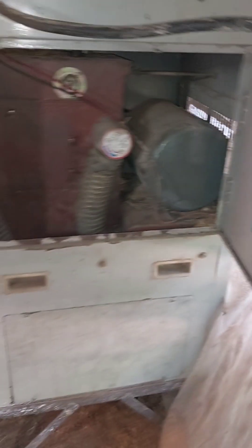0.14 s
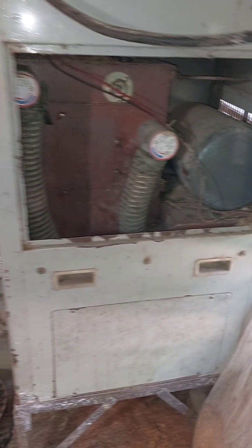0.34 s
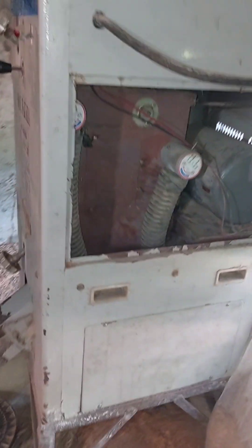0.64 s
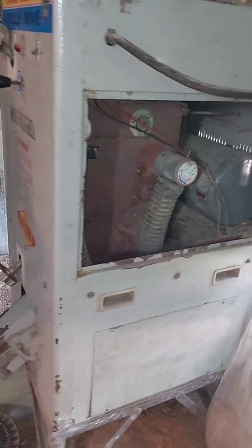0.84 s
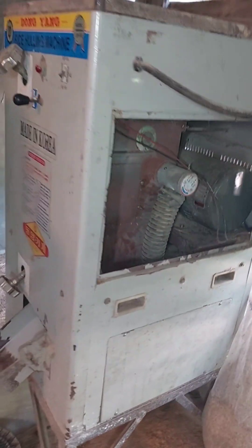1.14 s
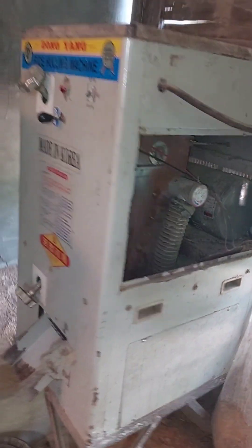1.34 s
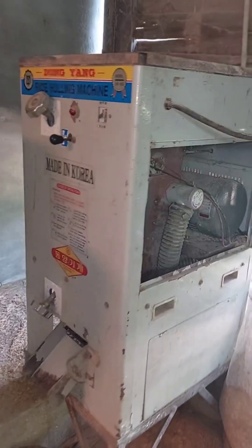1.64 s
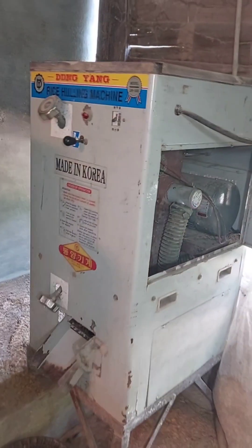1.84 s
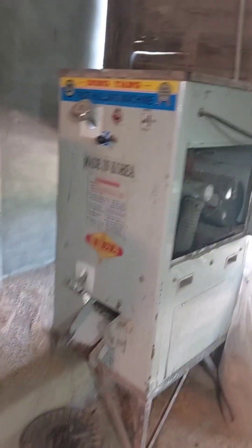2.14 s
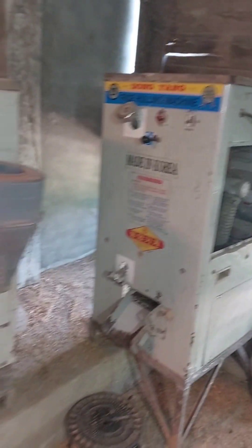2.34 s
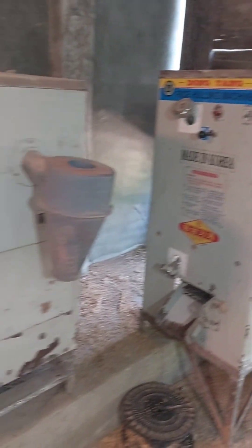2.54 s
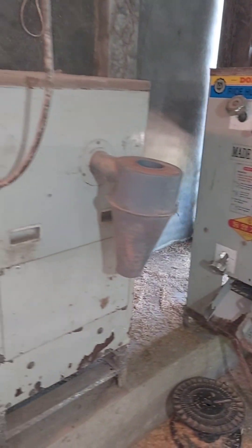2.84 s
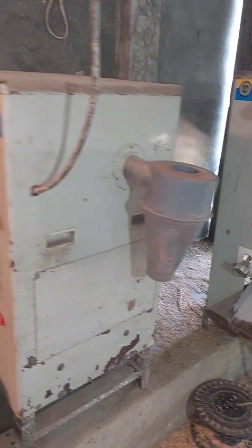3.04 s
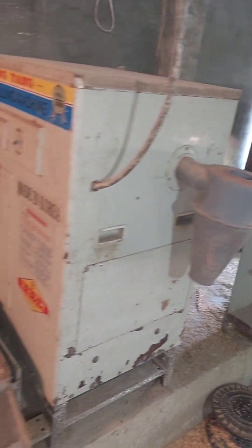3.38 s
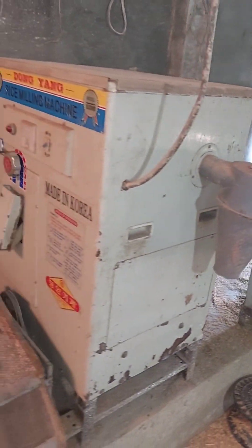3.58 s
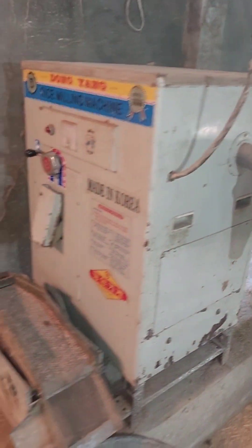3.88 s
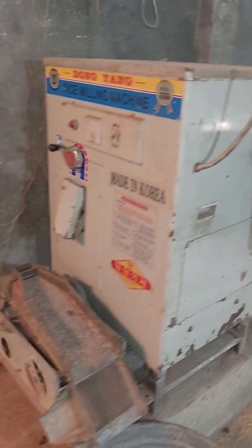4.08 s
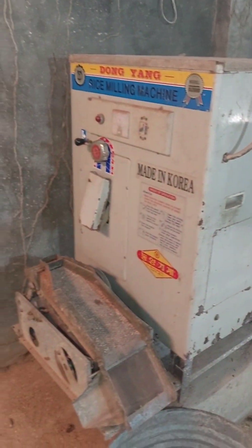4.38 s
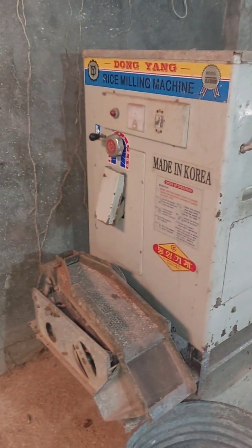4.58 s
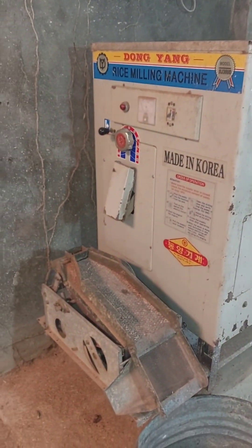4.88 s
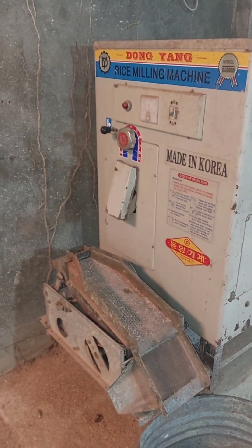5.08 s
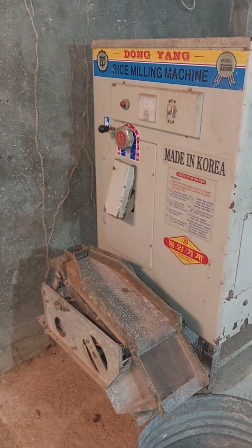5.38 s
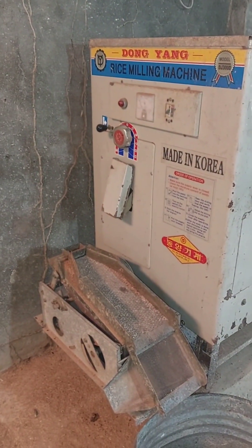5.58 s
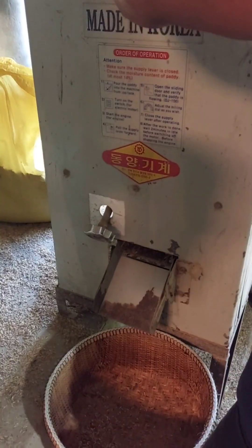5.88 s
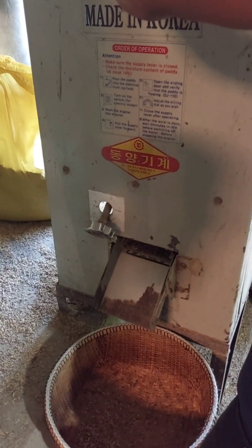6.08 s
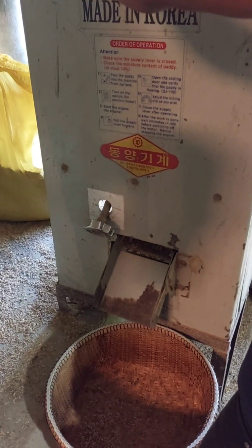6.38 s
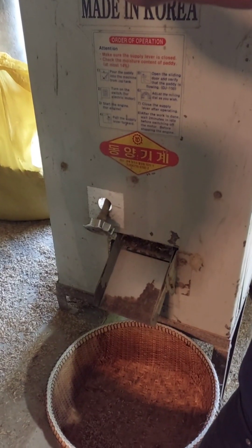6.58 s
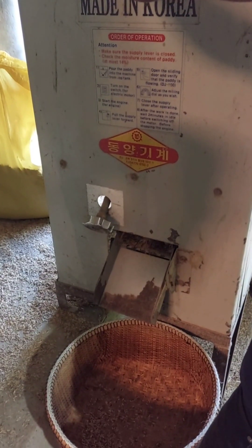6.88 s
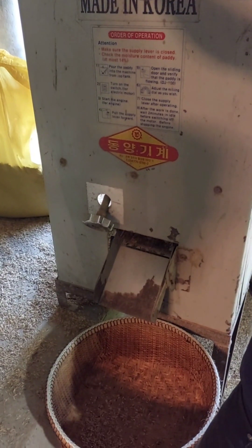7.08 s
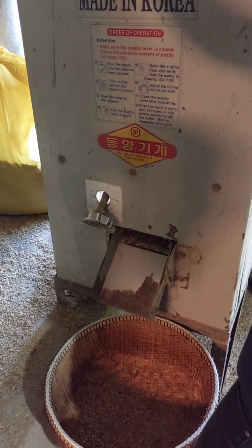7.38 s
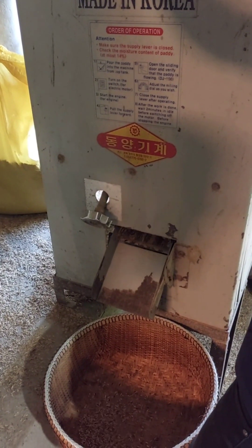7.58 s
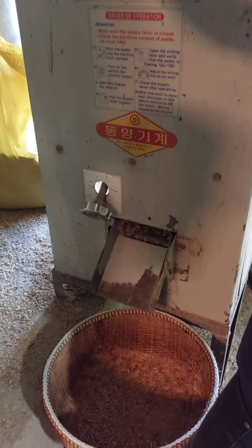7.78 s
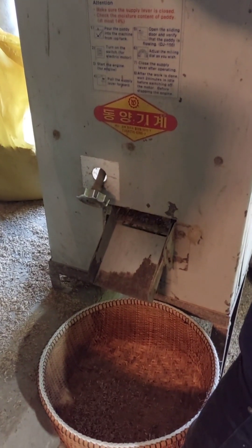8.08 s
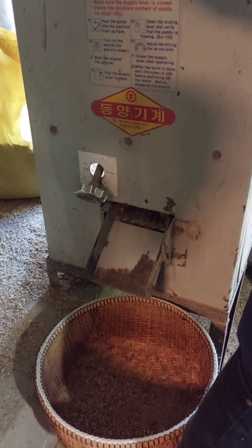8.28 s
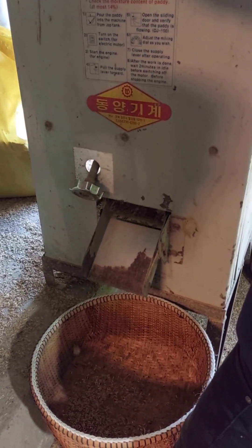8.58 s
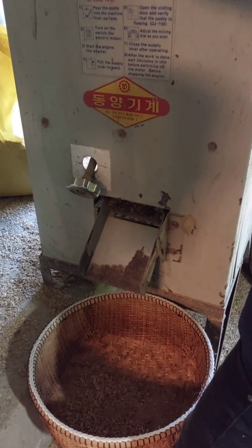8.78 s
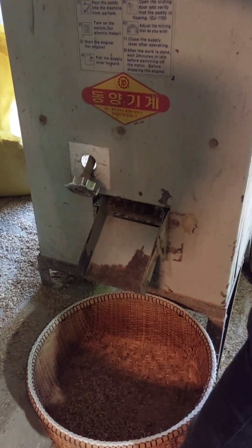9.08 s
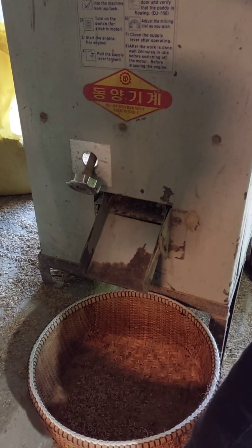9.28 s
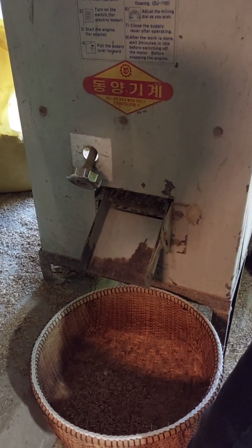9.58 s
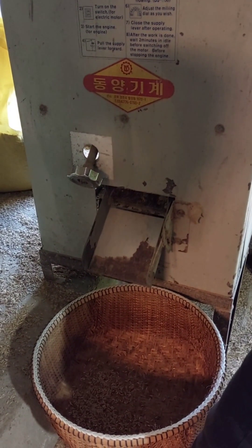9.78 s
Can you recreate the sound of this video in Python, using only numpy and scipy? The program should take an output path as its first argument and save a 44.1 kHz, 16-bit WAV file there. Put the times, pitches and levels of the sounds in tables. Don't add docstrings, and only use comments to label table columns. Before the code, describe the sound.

From 0 to about 5.8 seconds, a quiet echoing farm shed: chicks give short falling whistles around three kilohertz, quick chirps and hoarse rasps, scattered and overlapping. A hen clucks low and throaty roughly three times a second until about 4.5, then almost stops, with faint clucks near 5.7. The birds lie slightly right. Small finger ticks crackle on the phone; at 0.6 a board knocks with a light tap, soft grip thuds come around 3.2, and a hard, loud nail tap hits the right side at 3.97, followed by low draughty buffeting. Cloth rustles faintly throughout. At 5.77 everything cuts out for a few hundredths of a second, then a mill is abruptly at full speed, close and much louder: steady low roar, buzzing hum near 220 hertz multiples, airy hiss and ringing panels. Between 7.6 and 8.2 its colour shifts subtly as the phone moves; it continues unbroken to the end.

```python
import sys
import numpy as np
from scipy import signal
from scipy.fft import rfft, irfft, next_fast_len
from scipy.io import wavfile
from scipy.ndimage import uniform_filter1d, map_coordinates

SR = 44100
rng = np.random.default_rng(int(sys.argv[2]) if len(sys.argv) > 2 else 0)


def pcm_store(signal):
    levels = np.round(np.clip(np.atleast_2d(signal), -1, 1) * 32767)
    wavfile.write(sys.argv[1], SR, levels.astype(np.int16).T)


def volts(x):
    e = np.asarray(x, float) / 20
    return 10 ** e


N = 437913
SHED_END_S, MILL_START_S = 5.769, 5.8025

# t/s, peak level/dB
CLUCK_TIMES = [(0.257, -33.5), (.663, -32.5), (1.023, -36.5), (1.07, -38), (1.129, -39.5), (1.416, -34),
               (1.776, -33.5), (2.035, -43), (2.075, -30), (2.379, -34.5), (2.709, -29), (2.993, -47),
               (3.05, -32), (3.318, -52), (3.39, -45.5), (3.434, -31), (3.83, -49), (3.875, -45),
               (3.925, -31), (4.444, -36.5), (5.665, -59), (5.715, -51), (5.75, -57)]
CLUCK_S = 0.09


def unit(x):
    return x / np.sqrt(np.mean(x ** 2) + 1e-20)


def along(points, hz):
    f, v = np.transpose(points)
    return np.interp(np.log(hz + 1), np.log(f + 1), v)


def spectrum(points):
    return lambda f: volts(along(points, f))


def wobble(rate, size=N):
    knots = rng.standard_normal(int(size * rate / SR) + 4)
    return map_coordinates(knots, [np.arange(size) * rate / SR])


def sides(pan_db):
    return volts(np.array([[pan_db / 2], [-pan_db / 2]]))


def add_at(out, s, sound):
    start = round(s * SR)
    out[..., start:start + sound.shape[-1]] += sound


def filtered(x, response):
    m = next_fast_len(N + SR // 2)
    return irfft(rfft(x, m) * response(np.fft.rfftfreq(m, 1 / SR)), m)[..., :N]


def resonances(modes):
    def response(f):
        total = 0
        for k, (c, w, db) in enumerate(modes):
            total = total + (-1) ** k * volts(db) * 1j * f * w / (c * c - f * f + 1j * f * w)
        return total
    return response


def rush(gain, alike, lean, patchy_db):
    z = signal.stft(rng.standard_normal((2, N)), nperseg=512)[2]
    field = uniform_filter1d(rng.standard_normal(z.shape[1:]), size=6, axis=0)
    field = uniform_filter1d(field, size=10, axis=1)
    pair = signal.istft(z * volts(patchy_db * unit(field)), nperseg=512)[1][:, :N]

    def mid_side_gain(hz):
        turn = np.arccos(np.clip(along(alike, hz), -1, 1)) / 2
        return gain(hz) * [np.cos(turn), np.sin(turn)]

    mid, side = filtered(pair, mid_side_gain)
    ports = np.array([mid + side, mid - side])
    return unit(filtered(ports, lambda hz: volts(np.outer([.5, -.5], along(lean, hz)))))


def swells(rows, still_db, fade_db):
    t = np.arange(N) / SR
    gain = volts(still_db)
    for s, hold, db in rows:
        rise = 299 * np.maximum(s - t, 0)
        fade = fade_db * np.maximum(t - s - hold, 0)
        gain = gain + volts(db - rise - fade)
    return gain


def shed(x):
    # f/Hz, t60/s
    decay = [(200, 0.44), (1000, 0.27), (3000, 0.36), (8000, 0.33)]
    hz, t, z = signal.stft(rng.standard_normal((2, SR // 2)), SR, nperseg=256)
    t60 = np.maximum(along(decay, hz), .05)[:, None]
    tail = signal.istft(z * volts(-60 * t / t60), SR, nperseg=256)[1]
    late = np.pad(x, ((0, 0), (200, 0)))
    return signal.fftconvolve(late, tail / np.linalg.norm(tail[0]), axes=1)[:, :N]


def peeps():
    # t/s, length/s, from f/Hz, to f/Hz, level/dB
    whistles = [(.05, .06, 3800, 3850, -54), (0.157, 0.11, 3810, 3580, -51),
                (0.107, 0.22, 3176, 3185, -46.5), (.28, .035, 3240, 3250, -54),
                (.41, 0.062, 3230, 3170, -58), (.72, 0.067, 3240, 3260, -61), (.78, 0.054, 3800, 3850, -52),
                (0.811, 0.12, 3250, 2940, -42.5), (0.918, 0.21, 4380, 3830, -62),
                (1.057, 0.037, 1274, 1230, -46), (1.128, 0.043, 1240, 1250, -60),
                (1.572, 0.058, 3080, 3200, -54), (1.752, 0.2, 4760, 4140, -59),
                (1.92, 0.083, 2570, 2500, -66), (1.982, 0.067, 3900, 3900, -44.5),
                (2.062, 0.15, 3165, 2880, -45.5), (2.375, 0.038, 4950, 4800, -63),
                (2.513, .03, 4950, 4900, -62), (2.645, 0.027, 2830, 2940, -53),
                (2.669, 0.16, 3320, 2920, -42.5), (3.192, 0.13, 2920, 2670, -53.5),
                (3.319, 0.077, 2663, 2704, -40.5), (3.205, 0.043, 4140, 4080, -57),
                (3.305, 0.15, 4380, 4280, -56), (3.4, 0.17, 2560, 2470, -48.5),
                (3.45, .07, 3395, 3140, -41.5), (3.5, .13, 3160, 2900, -42.5),
                (3.759, 0.056, 4100, 3900, -56), (3.981, 0.15, 2610, 2470, -48.5),
                (3.982, 0.25, 2920, 2920, -57.5), (4.05, 0.19, 2740, 2620, -51),
                (4.476, 0.093, 3250, 3250, -50), (4.549, 0.17, 3175, 2963, -44),
                (4.657, 0.13, 2570, 2513, -48), (4.85, .035, 4400, 4380, -62),
                (5.004, 0.11, 4530, 4430, -60.5), (5.079, 0.19, 3390, 2960, -43.5),
                (5.258, 0.073, 5230, 5000, -59.5), (5.295, 0.14, 3290, 3220, -58),
                (5.55, 0.069, 3100, 2870, -65)]
    # t/s,
    # length/s, from f/Hz, to f/Hz, level/dB
    chirps = [(0.225, 0.097, 3660, 1867, -50), (0.463, 0.049, 5600, 4000, -64),
              (0.494, 0.052, 3950, 3180, -55), (1.134, .1, 2220, 4260, -61), (1.255, 0.14, 3720, 2940, -57),
              (1.47, 0.053, 3630, 3170, -55), (1.623, 0.048, 3050, 2000, -51.5),
              (1.716, 0.056, 4930, 3530, -66), (1.762, 0.063, 3650, 3170, -64),
              (1.9, 0.054, 4000, 3210, -58), (2.394, 0.057, 4750, 2550, -53),
              (2.528, 0.13, 4810, 3960, -58.5), (2.52, 0.079, 3790, 2910, -57),
              (2.842, 0.046, 5500, 3450, -54), (2.982, 0.089, 5100, 3180, -63),
              (3.252, 0.055, 4860, 4400, -58), (3.51, 0.045, 4950, 4000, -62),
              (3.59, 0.066, 5270, 3640, -53), (3.792, 0.045, 3860, 3150, -55),
              (4.041, 0.08, 4610, 3830, -50), (4.054, .13, 4750, 4200, -55), (4.53, 0.051, 4800, 4250, -65),
              (4.625, 0.065, 4950, 3750, -57.5), (4.677, 0.078, 4300, 3410, -52),
              (4.87, 0.087, 4720, 3460, -51), (5.328, 0.1, 5010, 2840, -54),
              (5.472, 0.046, 4240, 3280, -59), (5.605, 0.067, 5250, 3800, -67),
              (5.66, 0.069, 4090, 3900, -61), (5.657, 0.075, 1110, 903, -56),
              (3.354, 0.051, 5350, 3600, -58), (3.41, 0.048, 3110, 2030, -52),
              (4.12, 0.083, 4320, 3500, -63), (2.379, 0.027, 1885, 1970, -62),
              (0.297, 0.053, 2710, 2030, -58), (1.42, .05, 3900, 4470, -60), (1.99, .04, 4470, 4650, -62),
              (2.74, .09, 4330, 3900, -64), (3.92, .04, 4200, 4400, -60)]
    # t/s, length/s, from f/Hz, to f/Hz, level/dB
    mutters = [(3.5, 0.12, 2550, 2400, -45), (3.47, .12, 3000, 2700, -48), (4.56, .12, 3300, 2700, -52),
               (2.5, 0.099, 2900, 2700, -56), (0.5, .05, 895, 700, -60), (0.5, 0.043, 1500, 1300, -55),
               (3.815, .12, 1400, 1200, -54.5), (4, 0.33, 1700, 1400, -57)]
    # t/s, from f/Hz, level/dB
    rises = [(0.219, 2330, -55), (1.345, 2310, -61), (.71, 2600, -50), (3.87, 1980, -53),
             (4.43, 2756, -48.5), (4.529, 2104, -52), (5.028, 2455, -49), (5.66, 3195, -48)]
    # t/s, level/dB
    tails = [(0.901, -49), (2.209, -51.5), (2.829, -49), (3.661, -63), (4.742, -50.5), (5.23, -55.5),
             (5.431, -68)]
    return ([(s, n, hz, to_hz, 1.6, 1, db, -2.5) for s, n, hz, to_hz, db in whistles]
            + [(s, n, hz, to_hz, 1.1, .7, db, -4.5) for s, n, hz, to_hz, db in chirps]
            + [(s, n, hz, to_hz, 1, 0, db, -5.5) for s, n, hz, to_hz, db in mutters]
            + [(s, 0.14, hz, hz + 843, .6, .25, db, -5.5) for s, hz, db in rises]
            + [(s, 0.073, 2800, 2040, 1.1, .45, db, -7.5) for s, db in tails])


def chicks():
    near, far = np.zeros((2, 2, N + SR))
    for s, length, from_hz, to_hz, bend, clear, db, pan_db in peeps():
        n = round(length * SR)
        u = np.arange(n) / n
        tremble = 1 + .007 * wobble(50, size=n) + .007 * wobble(300, size=n)
        hz = (from_hz + (to_hz - from_hz) * u ** bend) * tremble
        phase = 2 * np.pi * np.cumsum(hz) / SR
        swell = unit(np.sin(np.pi * u ** .75) ** .5 * volts(2.3 * wobble(55, size=n)))
        rasp_db = (-6 if from_hz < 3700 else -10) - (1.5 if clear == 1 else 0)
        tone = clear + volts(rasp_db) * np.sin(np.pi * u) * wobble(1100, size=n)
        overtones = np.sin(2 * phase) + .4 * np.sin(3 * phase)
        voice = tone * (np.sin(phase) + volts(-24 if from_hz > 3000 else -33) * overtones)
        pan = sides(pan_db + 3.5 * rng.standard_normal())
        add_at(near if clear == 1 else far, s, volts(db + 4.5) * pan * swell * voice)
    near, far = near[:, :N], far[:, :N]
    whistlers = volts(-1) * near + volts(-5) * shed(near)
    return whistlers + volts(1.5) * far + volts(3.0) * shed(far)


def hen():
    # f/Hz, width/Hz, level/dB
    throat = [(403, 2100, -9.5), (670, 180, 1.5), (890, 240, -3), (1177, 93, 0)]
    head, chest = np.zeros((2, N + SR)), np.zeros(N + SR)
    gaps = np.diff([s for s, _ in CLUCK_TIMES], append=np.inf)
    for (s, db), gap in zip(CLUCK_TIMES, gaps):
        n = round(min(CLUCK_S, 1.3 * gap) * SR)
        start = s - 0.016
        u = np.arange(n) / n
        hz = 222 * (1.15 - 0.25 * u ** .6) * (1 + .08 * wobble(90, size=n))
        cycle = np.cumsum(hz) / SR
        pulses = np.diff(np.floor(cycle), prepend=0) * volts(5 * wobble(214, size=n))
        breath = rng.standard_normal(n) * (cycle % 1 < .5)
        arch = np.sin(np.pi * u ** .55) ** 1.4 * volts(-10 * u)
        swell = volts(db) * unit(volts(3.5 * wobble(60, size=n)) * arch) * .6
        stretch = rng.uniform(0, np.pi / 2)
        neck = np.array([[np.cos(stretch)], [np.sin(stretch)]])
        add_at(head, start, neck * swell * (unit(pulses) + 1.22 * breath))
        chest_gain = volts(-22.5 + 3 * wobble(84, size=n))
        add_at(chest, start, swell * chest_gain * np.sin(2 * np.pi * cycle))

    def necks(f):
        both = np.array([resonances(throat)(f), resonances(throat)(f * 1.085)])
        return both / (1 + (f / 1250) ** 8) / (1 + (300 / (f + 1)) ** 4)

    throaty = filtered(head[:, :N], necks).sum(axis=0)
    voice = (volts(3.0) * throaty + chest[:N]) * sides(-3.5)
    return volts(5.5) * voice + volts(4.5) * shed(voice)


def late_left(x):
    return np.array([np.roll(x[0], 18), x[1]])


def mill_tones(turns, stance, blade_hz):
    # multiple, left level/dB, right level/dB, left phase lead/rad, second-stance change/dB
    blades = [(2, -49, -40, -2.2, 0), (3, -37, -30, 0.6, 5), (4, -44, -29, -1.2, -3), (5, -42, -42, 2.2, 2),
              (6, -34, -34, -0.8, 4), (7, -43, -41, -0.3, 2), (8, -48, -45, 0.4, 5),
              (9, -52, -44, -0.2, -5), (10, -46, -41, -0.7, 0), (11, -56, -44, 2.4, 0),
              (12, -55, -52, -2.5, -1), (13, -52, -51, 1.9, 1), (14, -51, -53, 2.1, 1),
              (15, -49, -49, 2.3, -3), (16, -58, -56, -0.7, 1)]
    # f/Hz, left level/dB, right level/dB, left lead/rad, second-stance change/dB
    shafts = [(85.5, -42, -38, 0.2, 1), (100.9, -40, -37, -0.1, 3), (476.4, -32, -43, 1.5, 1),
              (563.2, -42, -34, -0.2, 4), (576.7, -35, -36, 0.3, 1), (670.9, -31, -33, -0.5, 5),
              (744.2, -41, -38, 0.6, 0), (1341.1, -43, -40, -1.3, 0), (1390.2, -43, -45, -1.7, 0),
              (1404.4, -47, -46, -0.5, 1), (1565.9, -44, -43, 1.1, -5), (1845.8, -50, -48, -1.5, -3),
              (1897.6, -53, -48, -1.5, 2), (2011.3, -51, -48, -3.0, 1), (2116.3, -52, -51, 0.0, -1),
              (2482.4, -52, -52, -1.1, 1), (2566.5, -53, -55, 2.0, -2), (2848.4, -53, -50, 1.9, 9),
              (2932.6, -54, -53, 2.4, 1), (3215.2, -55, -52, 1.3, 0)]
    n = len(turns)
    lines = [(k * blade_hz, *rest) for k, *rest in blades] + list(shafts)
    tones = np.zeros((2, n))
    for hz, left_db, right_db, lead, shift_db in lines:
        phase = 2 * np.pi * (hz * turns + rng.uniform()) + np.array([[lead], [0]])
        flutter_db = 2.2 * wobble(4, size=n) + 2.5 * wobble(18, size=n)
        drift_db = 1 + 1.1 * shift_db * (stance - .5) + flutter_db
        tones += volts([[left_db], [right_db]]) * volts(drift_db) * np.sin(phase)
    return tones


def mill():
    # t/s, share of it
    stance_points = [(7.6, 0.035), (8.2, 1)]
    # f/Hz, level/dB per Hz
    body_points = [(30, -38), (60, -21.5), (90, -6.5), (145, -9), (260, -1), (350, -2), (430, -5.5),
                   (520, -6), (640, -3), (800, -6.5), (1000, -11), (1450, -15.5), (2500, -35)]
    # f/Hz, level/dB per Hz
    hiss_points = [(800, -20.5), (1500, -1.5), (2200, -2.5), (2400, -6), (3600, -6.5), (4800, -9.5),
                   (5300, -8.5), (6500, -11.5), (8500, -18), (10000, -19), (12000, -13.5), (16000, -23.5)]
    # f/Hz, width/Hz, level/dB, second-stance change/dB
    panel_modes = [(248, 46, -35, 6.5), (662, 45, -29, 2.5), (1190, 64, -32, 2.5), (1330, 31, -34.5, 2.5),
                   (1547, 19, -30, -7), (2230, 89, -45, 10), (4090, 66, -41.5, 1.5), (4472, 55, -37, -3),
                   (258, 20, -42, 3), (333, 27, -39, 3), (3330, 85, -47, 0), (5210, 250, -38.5, 0.5),
                   (5560, 13, -42, 0), (7370, 100, -43, 0.5)]
    # f/Hz, likeness [0-1]
    alike = [(60, 0.89), (180, 1), (300, 0.76), (550, 0.52), (1650, 0.1), (4970, 0.07), (15000, 0.016)]
    # f/Hz, left-right level/dB
    lean = [(60, -3), (180, -3.5), (550, -3), (1650, -1.5), (4970, -5), (15000, -6)]
    n, blade_hz = N - round(MILL_START_S * SR), 220.19
    stance = np.interp(np.arange(N) / SR, *np.transpose(stance_points))[-n:]
    turns = np.cumsum(1 + .0003 * wobble(1.5, size=n)) / SR
    tones = mill_tones(turns, stance, blade_hz)

    body = rush(spectrum(body_points), alike, lean, patchy_db=-0.4)[:, -n:]
    hiss = rush(spectrum(hiss_points), alike, lean, patchy_db=1.03)[:, -n:]
    beat = 1 + 0.11 * np.sin(2 * np.pi * blade_hz * turns)
    roar = volts(-20 + 0.067 * wobble(15.0, size=n)) * body
    roar = roar + volts(-27 + 0.42 * wobble(13, size=n)) * beat * hiss

    def ringing(share):
        def gain(f):
            return np.sqrt(sum(volts(db + share * shift) ** 2 / w / (1 + (2 * (f - c) / w) ** 4)
                               for c, w, db, shift in panel_modes))
        return rush(gain, alike, lean, patchy_db=1.0)[:, -n:]

    panels = np.sqrt(np.clip(1 - stance, 0, 1)) * ringing(0)
    panels = panels + np.sqrt(np.clip(stance, 0, 1)) * ringing(1)
    return np.pad(tones + roar + volts(-27) * panels, ((0, 0), (N - n, 0)))


def finger():
    # t/s, peak level/dB
    ticks = [(.3925, -47), (.5201, -40.5), (.5861, -39), (.5905, -45), (.6448, -48.5), (.6808, -52),
             (.9985, -48), (1.665, -45), (1.7478, -52), (1.762, -53), (1.8627, -48), (3.3178, -53),
             (3.3847, -65), (3.4082, -55), (3.5852, -48), (3.6082, -45), (3.7448, -46), (3.9953, -22),
             (4.37, -47), (5.232, -51), (1.407, -50.5)]
    # t/s, peak level/dB, left-right level/dB, ring f/Hz, membrane push level/dB
    taps = [(.5991, -32, -4, 2100, -25), (3.962, -16, -22, 2400, 12.5), (3.9707, -19, -20, 4300, -30),
            (3.9749, -2.5, -26, 4400, -6)]
    out, t = np.zeros((2, N + SR)), np.arange(SR // 50) / SR
    for s, db in ticks:
        pan_db = -np.clip(1.2 * (db + 64), 0, 24.5)
        noise = rng.standard_normal(len(t))
        crack = np.diff(noise, 2, prepend=[0, 0]) * volts(-60 * t / .002) / 2
        add_at(out, s, volts(db + 7.5) * volts([[pan_db], [0]]) * crack)
    for s, db, pan_db, hz, push_db in taps:
        modes = sum(gain * np.sin(2 * np.pi * ratio * hz * t)
                    for ratio, gain in ((1, 1), (1.4, .9), (1.9, .7), (2.9, 1.3)))
        noise = rng.standard_normal(len(t))
        ring = (modes + .5 * noise) * volts(-60 * t / .003) * (1 - np.exp(-t / .00015))
        push = np.sin(2 * np.pi * 560 * t) * volts(push_db - 60 * t / .008) * (1 - np.exp(-t / .0007))
        add_at(out, s, volts(db) * (volts([[pan_db], [0]]) * ring + volts([[-16], [0]]) * push))
    return out[:, :N]


def struck(s, hz, db, t60, soft_s):
    t = np.arange(N) / SR - s
    decay = volts(db - 60 * np.abs(t) / t60)
    return (t > 0) * decay * np.sin(2 * np.pi * hz * t) * (1 - np.exp(-np.abs(t) / soft_s))


def knocks():
    # f/Hz, level/dB, t60/s
    board_modes = [(1640, 1, 0.011), (2420, -2.5, .02), (3900, -5, 0.014), (5500, -6, 0.0087)]
    # t/s, peak level/dB
    bumps = [(3.179, -34), (3.25, -39), (3.325, -38)]
    board = sides(-10) * sum(struck(.5958 + late, hz, -28.5 + db - 700 * late, t60, 0.00058)
                             for hz, db, t60 in board_modes for late in (0, .0115))
    grip = sides(-6) * sum(struck(s, 79, db, 0.091, .008) for s, db in bumps)
    return board + volts(-8) * shed(board) + grip


def shed_air():
    # t/s, hold/s, level/dB
    gusts = [(3.98, .82, -81), (4.95, 0.43, -84)]
    # t/s, hold/s, murmur level/dB, rustle level/dB
    stirs = [(0, 0.075, -60.5, -54), (0.526, .05, -76, -69), (0.606, .19, -64, -62.5),
             (1.057, 0.24, -76.5, -75.5), (1.43, 0.19, -66, -63), (2.012, 0.042, -63, -65),
             (2.165, 0.042, -56, -59.5), (2.663, 0.17, -62, -65), (3.07, 0.073, -72, -71.5),
             (3.425, 0.043, -58.5, -65), (3.61, 0.09, -68.5, -68.5), (4.008, 0.18, -60.5, -58.5),
             (4.307, 0.21, -81, -73.5), (4.53, 0.18, -73, -68), (5.09, 0.06, -76, -76),
             (5.72, .09, -67, -75.5)]
    # f/Hz, level/dB per Hz
    buffet_points = [(25, -39.5), (55, -5), (100, -10), (250, -8.5), (400, -17.5), (1000, -26.5),
                     (2000, -64)]
    # f/Hz, level/dB per Hz
    murmur_points = [(150, -12.5), (400, -17.5), (900, -9), (1450, -9.5), (2050, 1), (3000, 2), (5000, -8),
                     (8000, -24.5)]
    # f/Hz, level/dB per Hz
    rustle_points = [(2000, -26), (4500, -21.5), (6500, 2.5), (9000, -8.5), (12500, -2), (16000, -7.5)]
    thumps = [(s, CLUCK_S / 2, db - 38) for s, db in CLUCK_TIMES]
    lumps = swells([*gusts, *thumps], still_db=-78, fade_db=98.5)
    flock = swells([row[:3] for row in stirs], still_db=-88, fade_db=116)
    cloth = swells([(s, hold, db) for s, hold, _, db in stirs], still_db=-85, fade_db=116)

    hum = rush(lambda f: 1 / (1 + ((f - 52) / 11) ** 4), [(50, 0.74)], [(50, -12)], patchy_db=0.0)
    drone = swells(gusts, still_db=-120, fade_db=98.5) * hum
    buffet = rush(spectrum(buffet_points), [(100, 0.78)], [(100, -8.5)], patchy_db=2.5)
    murmur = rush(spectrum(murmur_points), [(300, .3), (1500, .02)], [(1000, -3)], patchy_db=4)
    rustle = rush(spectrum(rustle_points), [(5000, .02)], [(4000, -3), (15000, -8)], patchy_db=2.5)
    air = volts(13) * drone + volts(4.0) * lumps * buffet
    return air + volts(14.0) * flock * murmur + volts(3.5 + 2.0 * wobble(150)) * cloth * rustle


def scene():
    in_shed = np.arange(N) < SHED_END_S * SR
    birds = late_left(chicks() + hen())
    return in_shed * (birds + finger() + knocks() + shed_air()) + mill()


def low_pass(x):
    return signal.sosfilt(signal.butter(12, 16890, fs=SR, output="sos"), x)


def record(dry):
    held = dry / (1 + np.abs(dry / .9) ** 6) ** (1 / 6)
    mix = filtered(held, lambda hz: hz < 15950)
    return low_pass(mix)


dry = scene()
out = record(dry)
pcm_store(out)
```